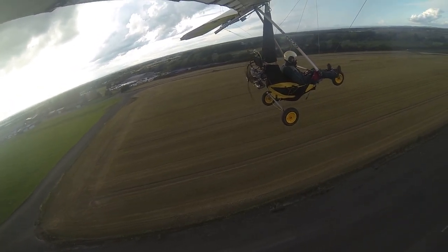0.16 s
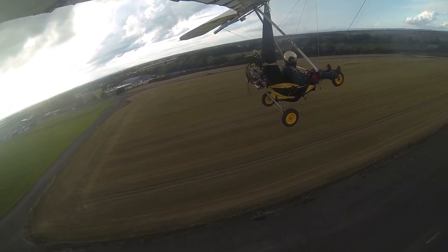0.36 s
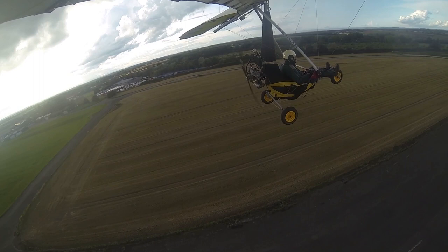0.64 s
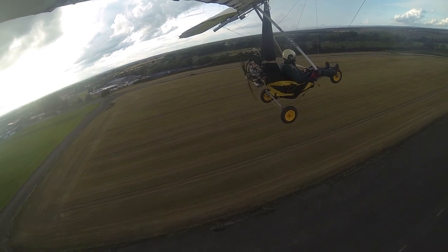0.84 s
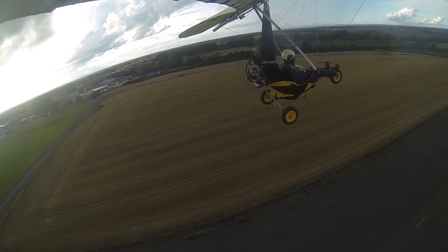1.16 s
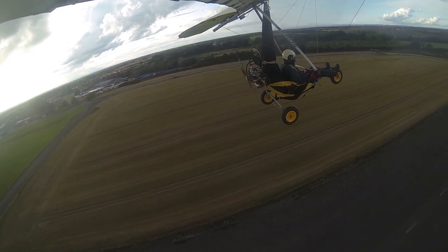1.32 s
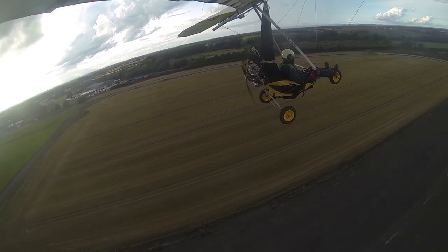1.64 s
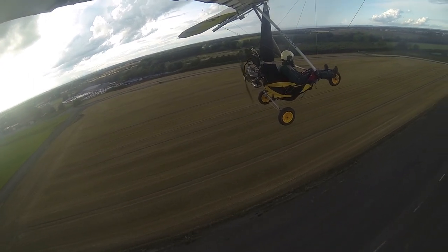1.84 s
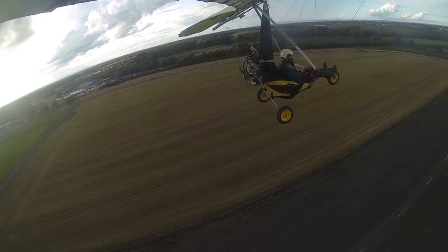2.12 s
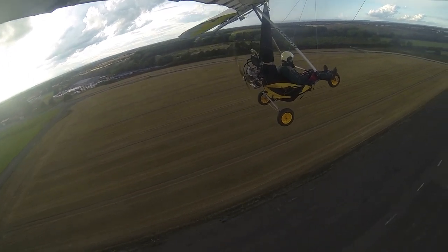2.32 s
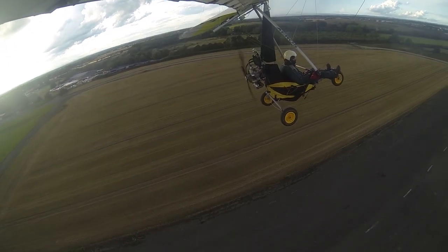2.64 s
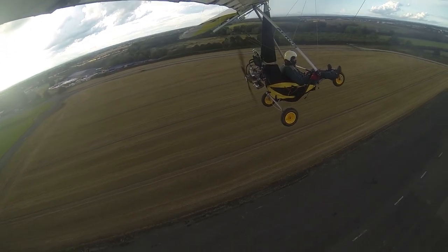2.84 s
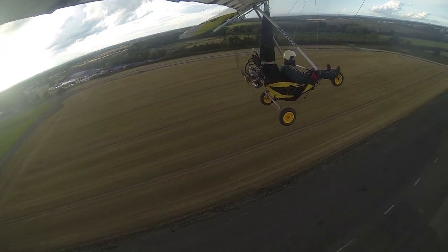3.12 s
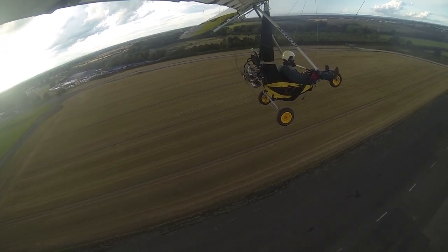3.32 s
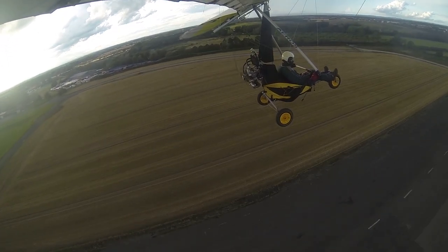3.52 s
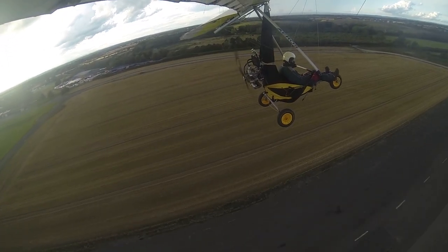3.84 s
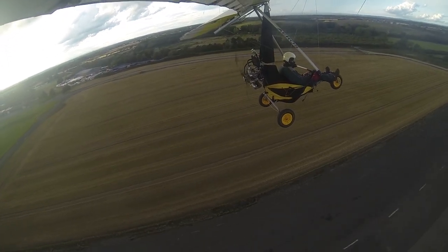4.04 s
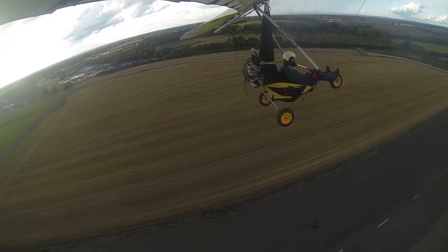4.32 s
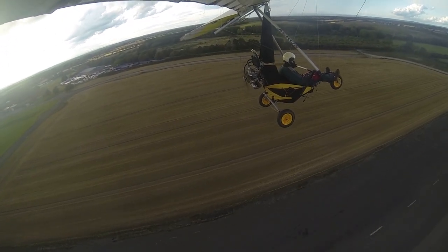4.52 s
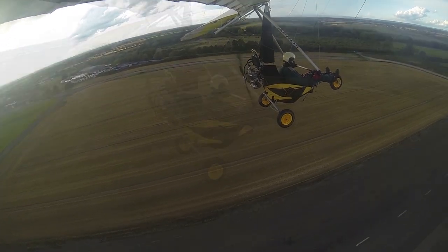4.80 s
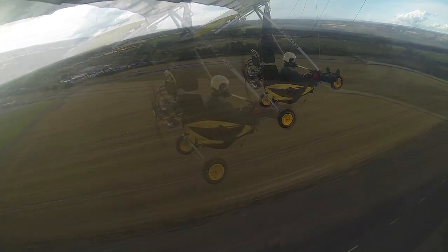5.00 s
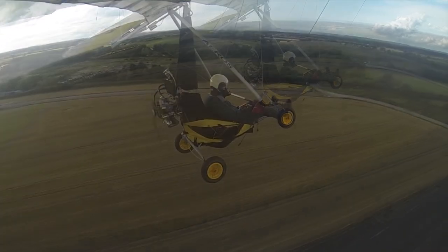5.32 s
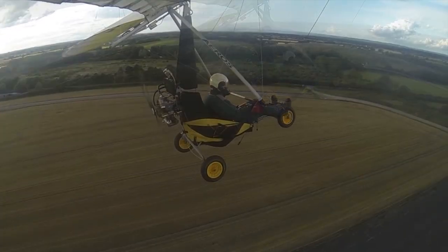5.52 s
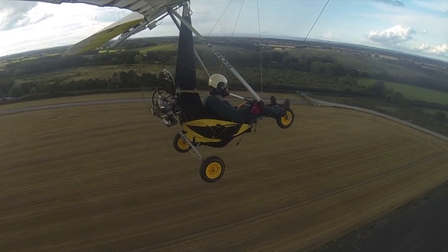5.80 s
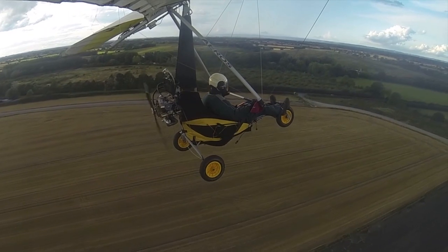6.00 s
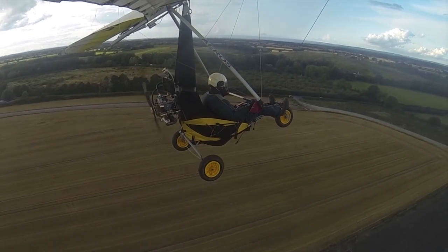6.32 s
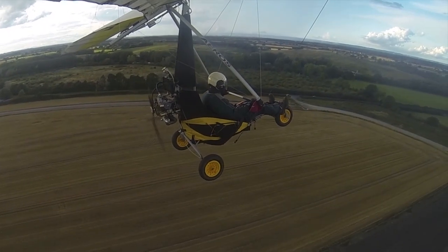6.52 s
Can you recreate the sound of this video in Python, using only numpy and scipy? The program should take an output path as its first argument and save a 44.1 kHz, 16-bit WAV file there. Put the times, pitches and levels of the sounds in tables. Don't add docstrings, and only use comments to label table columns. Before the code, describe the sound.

A small two-stroke aircraft engine drones at full power with its propeller buzzing, wind rumbling on the microphone, then the sound drops much quieter.

```python
import sys
import numpy as np
from scipy import signal
from scipy.fft import rfft, irfft, next_fast_len
from scipy.io import wavfile
from scipy.ndimage import uniform_filter1d

SR = 44100
rng = np.random.default_rng(int(sys.argv[2]) if len(sys.argv) > 2 else 0)


def voltage_ratio(decibels):
    exponent = np.asarray(decibels, float) / 20
    return 10 ** exponent


def dump_mix(stems):
    frames = np.atleast_2d(stems).T
    limited = np.clip(frames, -1, 1)
    pcm = np.round(limited * 32767).astype(np.int16)
    wavfile.write(sys.argv[1], SR, pcm)


N = 293706


def curve(table, column=1):
    rows = np.array(table)
    return np.interp(np.arange(N) / SR, rows[:, 0], rows[:, column])


def unit_rms(x):
    return x / np.sqrt(np.mean(x ** 2))


def colour(x, shape, rings=()):
    hz, db = np.transpose(shape)
    size = next_fast_len(N)
    f = np.maximum(np.arange(size // 2 + 1) * SR / size, 1)
    gain_db = np.interp(np.log(f), np.log(hz), db, left=-70, right=-70)
    for centre, width, top_db in rings:
        gain_db = gain_db + top_db / (1 + (2 * (f - centre) / width) ** 2)
    return unit_rms(irfft(rfft(x, size) * voltage_ratio(gain_db), size)[:N])


def walk(rate_hz):
    hold = int(SR / rate_hz)
    steps = np.repeat(rng.standard_normal(N // hold + 1), hold)
    smooth = uniform_filter1d(uniform_filter1d(steps, hold), hold)[:N]
    return smooth / smooth.std()


def per_cycle(angle):
    cycle = np.floor(angle / (2 * np.pi) + 0.5).astype(int)
    return rng.standard_normal(N // 100)[cycle - cycle[0]]


def grip(jet=False):
    # start t/s, end t/s, jet cut by the blades level/dB
    grips = [
        (.62, 1.24, -5),
        (4.99, 6.14, -1),
    ]
    t = np.arange(N) / SR
    height = sum(((t > start) & (t < end)) * (db if jet else 1) for start, end, db in grips)
    return uniform_filter1d(1.0 * height, size=4000)


def buffet():
    # f/Hz, level/dB per Hz
    rumble = [(14, -18.5), (28, 0), (50, -3.5), (70, -3), (120, -5), (200, -10), (320, -21.5), (500, -22)]
    # peak t/s, level/dB over the lull
    gusts = [(.03, 7), (.22, 6), (.47, 9), (.71, 8), (1.34, 2.5), (1.88, 12.5), (2.43, 8.5), (3.02, 9.5),
             (3.19, 0), (3.52, 6), (4.02, 3), (4.44, 6.5), (4.66, 7), (4.96, 7), (5.18, 7.5), (5.5, 4.5),
             (6.05, 6), (6.62, 7.5)]
    rise_s, fall_s = 0.16, 0.05
    t = np.arange(N) / SR
    gust_db = -26 - 1.0 * np.minimum(t, 3.5)
    for peak, db in gusts:
        gust_db = gust_db + db * np.exp(-((t - peak) / np.where(t < peak, rise_s, fall_s)) ** 2)
    knocks = voltage_ratio(1.0 * walk(25)) * rng.standard_normal(N)
    return colour(knocks, rumble) * voltage_ratio(gust_db)


def slipstream():
    # f/Hz, level/dB per Hz
    hiss = [(150, -9.5), (300, -14), (500, -10), (850, -6.5), (1200, -8.5), (1800, -19), (3000, -32),
            (5000, -30.5), (7200, -37.5), (8400, -36.5), (9500, -33), (10600, -39.5), (12600, -56),
            (14200, -58)]
    # centre f/Hz, width f/Hz, level/dB over the hiss
    casing_rings = [(4640, 30, 5), (5760, 50, 6), (6400, 80, 5), (6900, 50, 7), (7250, 40, 6),
                    (7900, 120, 4), (9300, 50, 6), (9630, 50, 6), (10320, 40, 5)]
    flicker = voltage_ratio(0.7 * walk(8.1))
    return colour(flicker * rng.standard_normal(N), hiss, casing_rings)


def tear(crank, blade):
    # f/Hz, level/dB per Hz
    torn_air = [(250, -17), (450, -11), (800, 0.5), (1100, -11), (1800, -9), (2300, -15), (3350, -21.5),
                (3500, -27), (4300, -24.5), (5200, -33.5), (6500, -35), (8000, -42), (11000, -59.5)]
    sweep = np.tanh(2 * (np.cos(blade + 0.1) - 0.25))
    gate = voltage_ratio(5.0 * sweep) * np.exp(0.19 * np.cos(crank - 4.0))
    grit = voltage_ratio(1.0 * rng.standard_normal(N // 40 + 1)).repeat(40)[:N]
    burst = voltage_ratio(0.8 * per_cycle(blade))
    return colour(gate * grit * burst * rng.standard_normal(N), torn_air)


def slap(crank, blade):
    def meet(crank_at, blade_at):
        return np.exp(2.6 * (np.cos(crank - crank_at) - 1) + 11.0 * (np.cos(blade - blade_at) - 1))

    pitch = 1.5 * per_cycle(blade) * np.sin(blade + 0.4)
    ring = np.cos(12 * crank + 5.0 * blade + pitch + 1.0 * walk(30))
    both_cylinders = meet(4.45, -0.9) + voltage_ratio(-3) * meet(2.6, 0.2)
    strength = voltage_ratio(0.8 * per_cycle(blade))
    return unit_rms(ring * both_cylinders * strength)


def blade_tones(crank, blade):
    # multiple of crank rate, multiple of blade rate, level/dB against the exhaust tone
    tones = [(0, 1, -17), (0, 2, -19.5), (0, 3, -24), (0, 4, -35), (2, 1, -20), (2, 2, -23), (2, 3, -26),
             (2, 4, -31), (2, 5, -36), (2, -1, -36), (3, 1, -36), (3, 2, -34), (1, 1, -37), (7, 1, -29),
             (7, 2, -30), (7, 3, -38), (8, 1, -38), (9, -1, -36), (9, 1, -39)]
    jet_db = grip(jet=True)
    total = 0
    for m, n, db in tones:
        level_db = db + 1.2 * walk(10) + (m == 2) * jet_db
        angle = m * (crank + 1.15) + n * blade
        total = total + np.sqrt(2) * voltage_ratio(level_db) * np.cos(angle)
    return total


def exhaust(crank):
    # multiple of crank rate, level/dB
    orders = [(1, -22), (2, -20.5), (3, -17.5), (4, -14), (5, -1.5), (6, -7), (7, 4), (8, -2.5), (9, -11),
              (10, -13), (11, -16.5), (12, -37), (13, -20), (14, -25), (15, -29.5), (16, -26.5), (17, -29),
              (18, -33)]
    puff = 0
    for k, db in orders:
        flutter_db = 0.5 * abs(db) / 12 * walk(14)
        lead = -1.1 + 0.08 * (k % 2) * min(k - 8, 0) ** 2
        lead = lead + 2.4 * (k > 10)
        puff = puff + voltage_ratio(db + flutter_db) * np.cos(k * crank + lead)
    burn = uniform_filter1d(per_cycle(crank + np.pi / 2), size=60)
    return unit_rms(puff * voltage_ratio(0.54 * burn))


def fade():
    full_db, faded_db = -24, -36.5
    start_s, end_s = 4.78, 5.63
    share = np.clip((np.arange(N) / SR - start_s) / (end_s - start_s), 0, 1)
    return voltage_ratio(full_db + (faded_db - full_db) * share ** 1.77)


def scene():
    # t/s, crankshaft f/Hz
    speed = [(0.0, 113.11), (0.22, 113.48), (0.57, 112.9), (0.67, 112.19), (1.16, 112.44), (1.3, 113.36),
             (1.83, 113.16), (2.01, 112.41), (2.09, 113.16), (3.37, 112.95), (3.49, 112.53), (4.28, 113.03),
             (4.59, 114.29), (4.94, 114.79), (5.04, 114.02), (6.1, 115.07), (6.15, 115.56), (6.66, 115.61)]
    # t/s, then slaps, hiss and torn air as level/dB against the exhaust tone
    meeting = [
        (0, -24, -18, -17),
        (4.4, -24, -18, -17),
        (4.8, -22, -18.5, -16),
        (6.66, -22, -18.5, -16),
    ]
    step = 2 * np.pi * (curve(speed) + 0.1 * walk(25)) / SR
    crank = np.cumsum(step) + 0.9
    slipping, gripping = 0.7062, 0.7126
    blade = np.cumsum(step * (slipping + (gripping - slipping) * grip())) - 0.3

    slap_db, hiss_db, tear_db = (curve(meeting, column) for column in (1, 2, 3))
    air = voltage_ratio(tear_db + 1.86) * tear(crank, blade) + voltage_ratio(hiss_db) * slipstream()
    chop = voltage_ratio((slap_db + 24) / 2) * blade_tones(crank, blade) + voltage_ratio(slap_db) * slap(crank, blade)
    mix = voltage_ratio(-0.1) * exhaust(crank) + chop + air + voltage_ratio(5) * buffet()
    return (mix * fade())[None]


def top_cut(x):
    return signal.sosfilt(signal.butter(12, 15000, fs=SR, output="sos"), x)


def record(dry):
    return top_cut(dry)


dry = scene()
out = record(dry)
dump_mix(out)
```